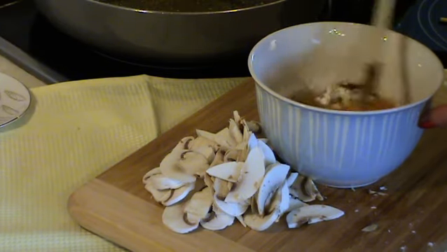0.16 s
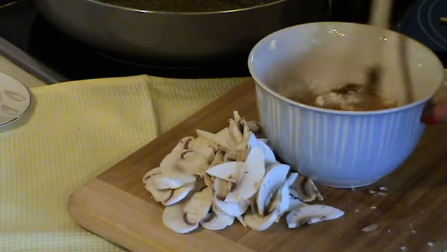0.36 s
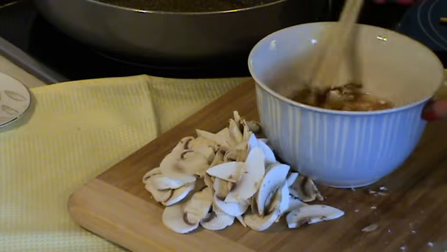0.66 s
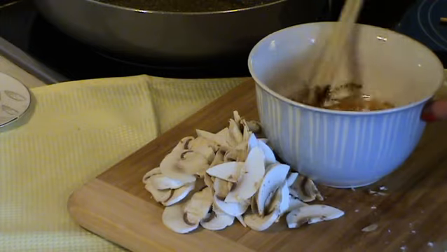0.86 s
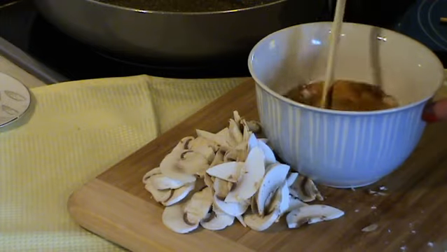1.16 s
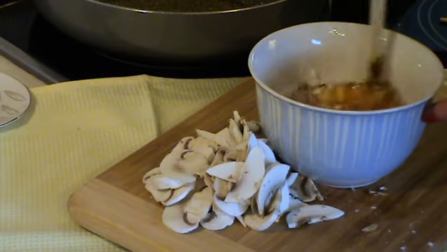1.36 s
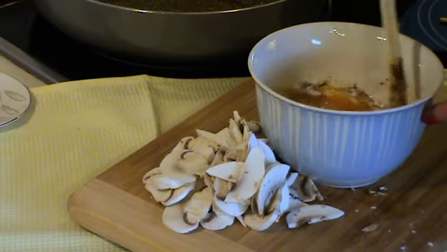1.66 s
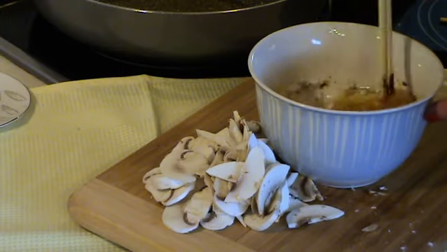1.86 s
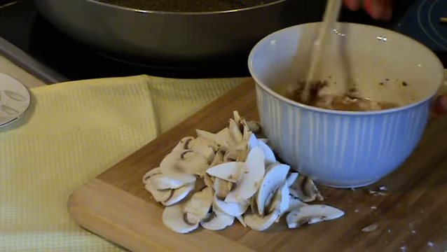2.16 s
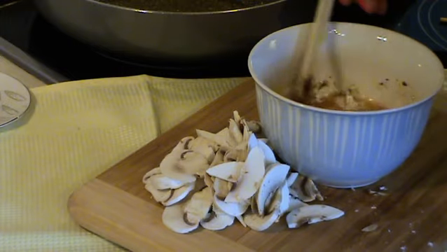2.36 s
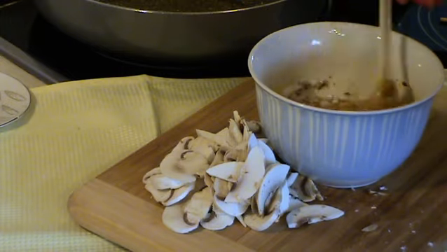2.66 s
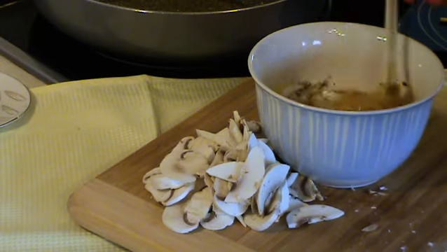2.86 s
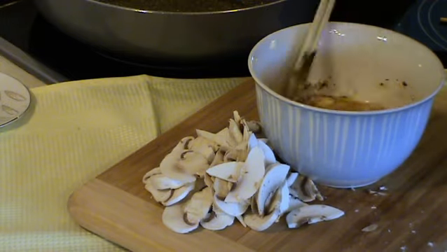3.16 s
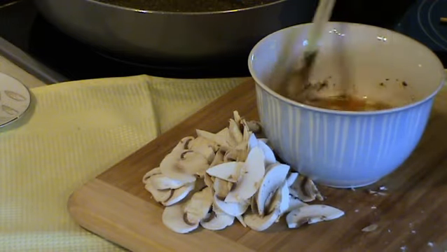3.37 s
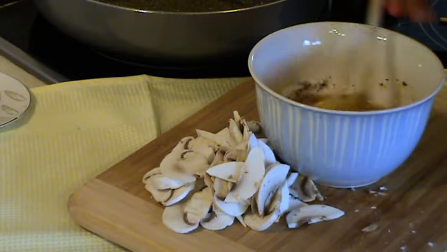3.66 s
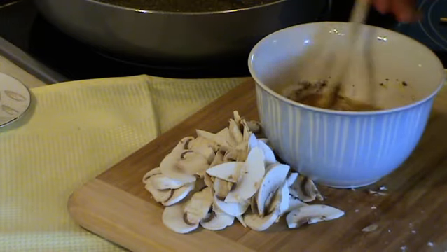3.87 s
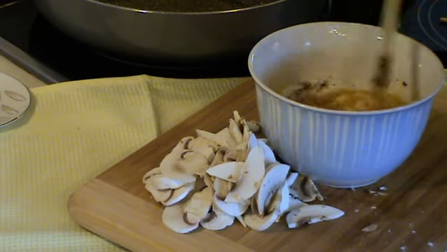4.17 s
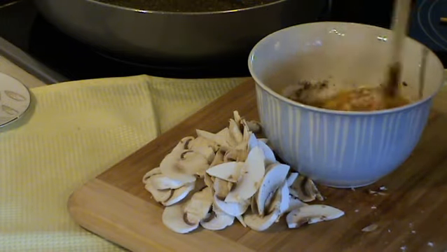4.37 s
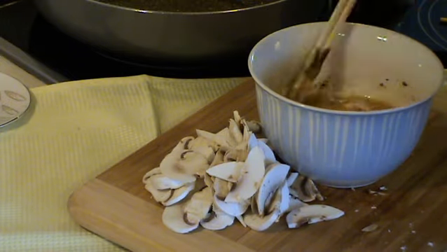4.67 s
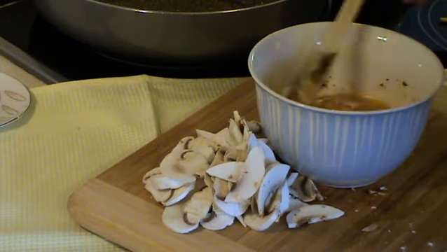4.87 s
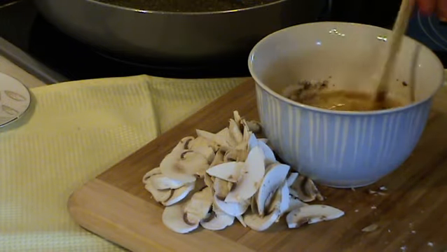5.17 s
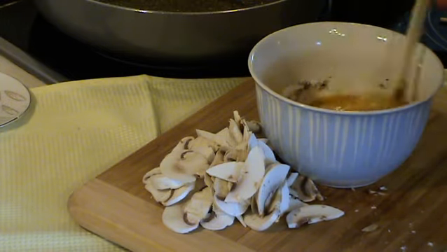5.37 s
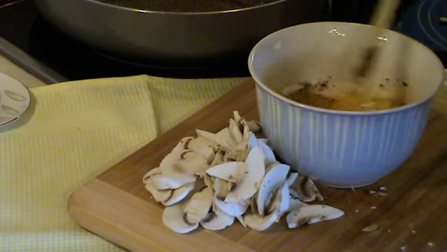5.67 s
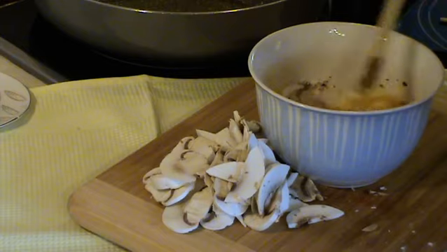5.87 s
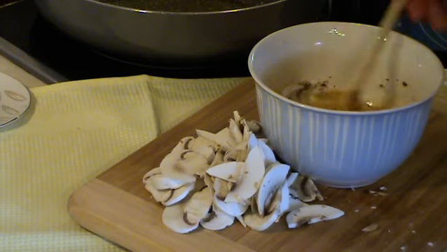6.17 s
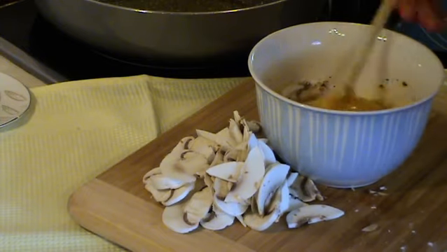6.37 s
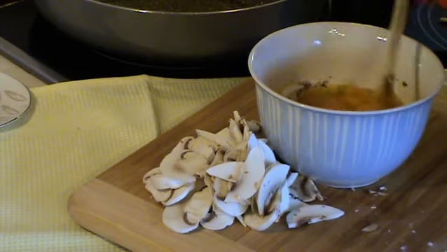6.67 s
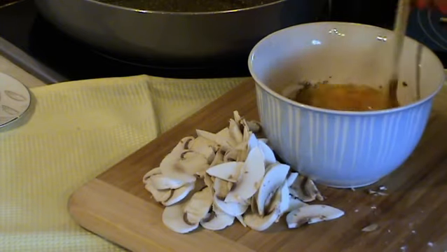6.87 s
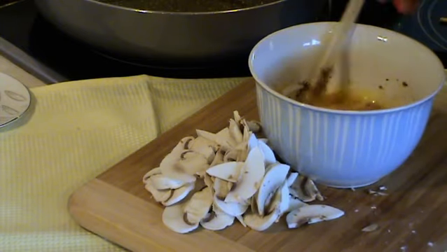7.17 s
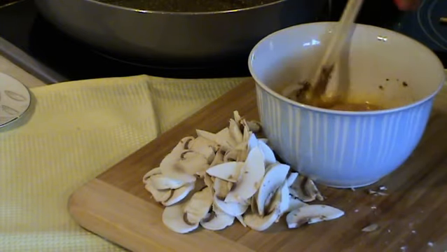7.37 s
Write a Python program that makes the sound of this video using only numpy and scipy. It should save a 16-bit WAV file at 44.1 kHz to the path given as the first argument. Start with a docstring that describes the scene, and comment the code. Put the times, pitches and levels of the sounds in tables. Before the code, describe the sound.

Close up in a small kitchen, wooden chopsticks beat eggs in a ceramic bowl at nearly five strokes a second. Dry clicks vary in strength; harder taps make the bowl ring briefly and brightly. Wet slops, small rising plops, grainy drags and tiny froth pops follow the strokes. The beating hesitates once early, then continues steadily to the end. Close stereo microphone, short room reflections, faint low hum and hiss.

```python
"""A small kitchen, close up: wooden chopsticks beat eggs in a ceramic bowl, nearly five strokes a second.
The sticks click in band-passed noise bursts; hard strokes reach the bare wall and ring its paired modes.
Short damped tones, mostly trapped air plopping, rise in pitch; the egg slops, drags and froths in noise
swells and tiny pops. A short noise-tail room surrounds the bowl, over a faint sine hum and coloured hiss."""
import sys
import numpy as np
from scipy import signal
from scipy.fft import rfft, irfft, next_fast_len
from scipy.io import wavfile

SR = 44100
rng = np.random.default_rng(int(sys.argv[2]) if len(sys.argv) > 2 else 0)


def int16_out(signal):
    """Quantize to a 16-bit WAV file."""
    q = np.round(np.clip(np.atleast_2d(signal).T, -1, 1) * 32767)
    wavfile.write(sys.argv[1], SR, q.astype(np.int16))


N = 331191

# Event levels come before the layer trims and the room.
# sticks clicking in the egg: (time [s], level [dB], brightness [dB per octave], t60 [s])
# a short t60 is a clean knock, a long one a skid
CLICKS = [(0.0997, -39, 0, 0.033), (0.3146, -40.5, 3.5, 0.01), (0.331, -43.5, -3, .014),
          (.706, -35.5, 18, 0.025), (0.7182, -43, -4, .03), (0.8106, -37.5, 6, 0.017),
          (0.9386, -43.5, -5, 0.093), (1.0099, -51, -1.5, .03), (1.1211, -54, 6, 0.0046),
          (1.3608, -55.5, -1, 0.021), (1.6048, -35.5, 0.5, 0.035), (1.69, -41.5, -1, 0.03),
          (1.712, -47.5, 6, 0.023), (1.7335, -39.5, -2.5, 0.029), (1.8146, -46, -5, 0.0088),
          (2.037, -34.5, -2.5, 0.016), (2.1515, -51.5, 16, 0.017), (2.242, -37, -2, 0.023),
          (2.3583, -35.5, 5, .012), (2.3598, -37, 2.5, 0.0043), (2.4411, -36.5, 0.5, 0.055),
          (2.449, -37.5, -18, 0.013), (2.579, -34, 0, 0.0044), (2.6619, -32.5, -12, 0.035),
          (2.6658, -32.5, 6.5, 0.025), (2.848, -44, -5, 0.0058), (2.9317, -44, -4.5, 0.0094),
          (3.001, -39.5, 2.5, 0.01), (3.2312, -49.5, 6, .022), (3.474, -38, 1.5, .03),
          (3.4853, -40.5, 0.5, 0.12), (3.689, -32, 0.5, 0.055), (3.699, -33, 3.5, .008),
          (3.813, -49, 7, 0.027), (3.9119, -32.5, 0, 0.011), (4.079, -43, -2.5, 0.03),
          (4.4075, -40.5, -2.5, 0.031), (4.5225, -47.5, 0.5, .014), (4.536, -43, -2, 0.015),
          (4.7463, -38.5, 0.5, 0.024), (4.9548, -32, 1.5, 0.024), (5.0064, -46, -5.5, 0.045),
          (5.1713, -37.5, -0.5, 0.019), (5.2149, -45, -6, 0.036), (5.229, -51, -9, .04),
          (5.3611, -42.5, -1.5, 0.056), (5.4785, -48.5, 6, 0.018), (5.5327, -48, -0.5, 0.0071),
          (5.654, -38.5, -3.5, 0.014), (5.7141, -38.5, -0.5, 0.02), (5.8896, -46.5, 11, .018),
          (5.9934, -33, 1, 0.0096), (6.1199, -44, 8, .018), (6.212, -35, -1.5, .02),
          (6.2507, -50, -3, .027), (6.3638, -41.5, -5.5, 0.0071), (6.4032, -39, -2.5, 0.018),
          (6.5457, -36.5, 2.5, 0.0047), (6.6114, -44, 2, .04), (6.6262, -38, 2, 0.0071),
          (6.747, -47.5, 11.5, 0.0099), (6.832, -36, -1.5, 0.037), (6.8366, -33.5, -9, 0.021),
          (6.9532, -49.5, -1, 0.011), (7.031, -36, 0, 0.027), (7.0438, -33.5, -1.5, 0.016),
          (7.1621, -36.5, -3, 0.013), (7.3822, -35.5, 5.5, 0.0064), (7.4554, -38, 17, 0.037)]
# taps on the bare wall:
# (time [s], click level [dB], brightness [dB per octave], ring level [dB], pitch the struck spot favours [Hz])
TAPS = [(0.5258, -35.5, -1, -42.5, 6500), (.5315, -38, -8.5, -39.5, 6040), (2.8665, -31, -0.5, -42.5, 7650),
        (3.0596, -29, 0.5, -30, 6000), (3.077, -29.5, 0, -31, 4500), (3.2676, -36.5, -2.5, -48.5, 5400),
        (4.1106, -34, -1, -41, 3500), (4.1256, -31.5, -2.5, -38.5, 6000), (4.3176, -25.5, 3, -32.5, 6400),
        (4.3385, -30, -3, -36, 4540), (5.3775, -32, 0, -29.5, 4580), (5.5767, -28, 2.5, -31, 8700),
        (5.794, -33.5, -3, -36, 7200), (7.2456, -28.5, 2.5, -32, 8900), (7.2652, -34, -5, -32, 4730),
        (7.4616, -26.5, -2, -27.5, 9500)]
# short damped tones: mostly air pockets, with a stopped bowl ring at 0.53 s and a faint squeak at 3.4 s:
# (time [s], pitch [Hz], level [dB], t60 [s])
DAMPED_TONES = [(0.3313, 3770, -42, 0.0068), (0.5286, 3230, -33, 0.02), (0.9386, 1300, -42, 0.029),
                (.969, 1320, -41, 0.0047), (.976, 1690, -50.5, .02), (1.0114, 1293, -41.5, 0.027),
                (1.12, 3840, -47.5, 0.0059), (1.6902, 3300, -34.5, 0.0017), (1.7361, 1530, -46.5, 0.014),
                (2.1527, 3540, -40, 0.011), (2.358, 3474, -30, 0.014), (2.4478, 1250, -34.5, 0.027),
                (2.4827, 1900, -43.5, 0.12), (2.577, 3470, -27.5, 0.012), (2.7955, 1125, -49, 0.02),
                (2.931, 1810, -36, 0.011), (3, 1050, -38.5, 0.0082), (3.405, 7400, -51.5, 0.004),
                (3.4775, 2060, -36, 0.006), (4.082, 1645, -41.5, 0.039), (4.1985, 1720, -45.5, 0.025),
                (4.838, 1250, -52.5, 0.037), (5.0069, 2520, -44, 0.0084), (5.04, 1190, -46, 0.0067),
                (5.229, 1390, -41.5, 0.031), (5.232, 2320, -49, .012), (6.5448, 1054, -26.5, 0.019),
                (6.8337, 813, -36.5, 0.025), (7.033, 5250, -35.5, 0.029)]
# egg thrown against the wall, with levels of its own: (time [s], deep level [dB], splash level [dB])
THROWS = [(0.529, -52, -50), (0.599, -57, -54), (.706, -55, -56), (1.52, -62, -85), (1.682, -58, -74),
          (2.033, -60, -59), (2.446, -58.5, -63), (3.067, -51.5, -43.5), (3.267, -52.5, -58.5),
          (4.116, -51.5, -48), (4.321, -52, -46.5), (5.579, -52, -45), (6.545, -61.5, -81),
          (7.249, -48.5, -39), (7.465, -51.5, -55.5)]
# scrapes along the glaze: (time [s], level [dB], half length [s])
SCRAPES = [(0.33, -65, 0.011), (1.389, -59, .022), (1.714, -55, 0.016), (1.843, -60.5, 0.057),
           (2.281, -53, .008), (2.672, -51, .013), (3.68, -50.5, 0.0065), (3.913, -42, 0.0083),
           (4.099, -47, 0.0041), (4.316, -46, .002), (6.388, -46, 0.0048), (6.452, -56.5, 0.015),
           (7.241, -48, .0024)]

# bending modes of the bowl: nominal pitch [Hz]
BOWL_HZ = [1314, 3315, 6012, 9232, 12800]
# decay of each mode and nominal distance to its twin: (t60 [s], split [Hz])
BOWL_MODES = [(0.23, 24.7), (0.26, 9), (0.27, 30), (0.088, 19), (0.035, 25)]
# click bands: (low edge [Hz], high edge [Hz])
CLICK_EDGES = [(780, 1390), (1500, 3350), (3000, 5900), (6000, 9570), (10000, 13300)]
# colour of a contact before the brightness tilt, one value per click band: (relative level [dB])
CLICK_COLOUR = [-7, 0.5, 1, -4.5, -17]
TAP_COLOUR = [-4.5, -1.5, 3.5, -2.5, -10]
# colour of the ring before tilt and struck spot, one value per middle bowl mode: (relative level [dB])
RING_COLOUR = [0, -12.5, -9.5]

# noise colours of the moving egg and the dragging sticks: (frequency [Hz], relative density [dB per Hz])
DEEP = [(45, -51), (82, -2.5), (108, -11), (160, 2), (205, -3.5), (260, -8.5), (420, -13.5), (900, -47.5)]
GULP = [(110, -15), (290, -2), (425, 3), (510, -9.5), (600, 0.5), (750, -25), (1500, -47)]
SPLASH = [(350, -33), (600, -12), (860, 6.5), (1050, 0), (1300, 8.5), (1600, -14), (4000, -48)]
DRAG = [(500, -9), (1100, 5), (2500, 7), (3800, 9.5), (7000, 6.5), (11000, -12), (16000, -21)]
# every stroke drags into the egg and out again:
# (time after the beat [s], level relative to stroke force [dB], half length [s])
DRAGS = [(-.002, -32.5, 0.013), (0.042, -27.5, 0.054)]

# decay of the room: (frequency [Hz], t60 [s])
KITCHEN = [(150, 0.48), (530, 0.38), (1400, 0.43), (3700, 0.3), (9700, 0.25), (16000, 0.18)]
# room air and microphone hiss, mid then side: (frequency [Hz], density [dB per Hz])
FLOOR_MID = [(20, -102), (60, -102), (110, -97), (165, -91), (250, -100), (650, -99), (1000, -102),
             (3000, -104), (5000, -106), (9000, -108.5), (9400, -103.5), (9800, -109), (16000, -109)]
FLOOR_SIDE = [(20, -115), (70, -109), (160, -100), (600, -96), (1700, -99.5), (3000, -104.5), (7500, -112),
              (11000, -116), (15000, -128)]
# phase lead of the left microphone port over the right: (frequency [Hz], phase [rad])
PORT_PHASE = [(100, 0), (400, 0.079), (1300, 0.36), (3000, 0.21), (9000, 0.33), (15000, 0)]
# the hand circles at a steady beat and hesitates once: (bout start [s], bout end [s])
BOUTS = [(0.1, 1.2), (1.61, 7.51)]

BEAT_S = 0.209
DEEP_DB, SPLASH_DB = -28.5, -27  # slop of any other stroke, relative to its force
SPOT_DB, SPOT_OCTAVES = 14, 0.49  # how much the struck spot lifts the modes near its pitch, and how near
DULL_ABOVE_HZ = 7500  # wood is too soft for the brightness tilt to rise beyond this
MAINS_HZ, TOP_HZ = 50, 16100


def amp(db):
    """Decibels to amplitude."""
    return 10 ** (np.asarray(db) / 20)


def unit(x):
    """Scales a sound to rms 1."""
    return x / np.sqrt(np.mean(x ** 2) + 1e-20)


def burst(x):
    """Gives a short sound the energy of a hundredth of a second at rms 1."""
    return x / np.sqrt(np.sum(x ** 2) / (SR / 100) + 1e-20)


def along(points, hz):
    """Reads (frequency [Hz], value) points on a log frequency axis."""
    f, v = np.transpose(points)
    return np.interp(np.log(hz + 1), np.log(f + 1), v)


def clock(seconds):
    """Sample times of a short sound."""
    return np.arange(int(seconds * SR)) / SR


def fade(t, t60):
    """Exponential decay by 60 dB in t60."""
    return np.exp(-np.log(1000) * t / t60)


def wander(t, depth_db, count):
    """A gain that drifts at random between evenly spaced knots."""
    knots = np.linspace(t[0], t[-1], num=count)
    return amp(depth_db * np.interp(t, knots, rng.standard_normal(count)))


def add(out, s, sound):
    """Mixes a sound into out at time s."""
    start = max(round(s * SR), 0)
    part = sound[..., :max(N - start, 0)]
    out[..., start:start + part.shape[-1]] += part


def filtered(x, response):
    """Filters x by a response given as a function of frequency."""
    m = next_fast_len(x.shape[-1] + 4096)
    spectrum = rfft(x, m) * response(np.fft.rfftfreq(m, 1 / SR))
    return irfft(spectrum, m)[..., :x.shape[-1]]


def coloured(points, size):
    """Noise with the given density in dB per Hz."""
    white = rng.standard_normal(size) * np.sqrt(SR / 2)
    return filtered(white, lambda hz: amp(along(points, hz)))


def kitchen(x, wet_db, width_db=-9.5, early=1.45, early_s=0.0049):
    """Puts a sound in the stereo room: strong early bounces off bowl and counter, then a short tail."""
    hz, t, z = signal.stft(rng.standard_normal((2, SR // 3)), SR, nperseg=256)
    decayed = z * fade(t, along(KITCHEN, hz)[:, None])
    tail = signal.istft(decayed, SR, nperseg=256)[1]
    t = np.arange(tail.shape[1]) / SR
    tail = tail * (1 + early * np.exp(-t / early_s)) * (1 - np.exp(-t / 0.00061))
    mid, side = amp(wet_db) * tail / np.linalg.norm(tail[0])
    mid[0] += 1  # the direct sound
    side = side * amp(width_db)
    return signal.fftconvolve(x[None], np.array([mid + side, mid - side]), axes=1)


def strokes():
    """(time [s], force [dB]) of every beat; force sums the contacts within a quarter beat either side."""
    s, db = np.transpose([row[:2] for row in CLICKS + TAPS])
    beats = np.concatenate([np.arange(start, end, BEAT_S) for start, end in BOUTS])
    forces = []
    for beat in beats:
        near_db = db[abs(s - beat) < BEAT_S / 4]
        forces.append((beat, 10 * np.log10(np.sum(amp(near_db) ** 2) + 1e-20)))
    return forces


def tilted(colour_db, hz, db, brightness):
    """Shares a level among bands or modes; a harder contact favours the high ones."""
    shape = np.add(colour_db, brightness * np.log2(hz))
    return db + shape - 10 * np.log10(np.sum(amp(shape) ** 2))


def contact(colour_db, db, brightness):
    """Level of each click band for one contact."""
    centres = np.sqrt(np.prod(CLICK_EDGES, axis=1))
    return tilted(colour_db, np.minimum(centres, DULL_ABOVE_HZ), db, brightness)


def click(bands_db, t60, snap=1.7, swish_db=-19, swish_s=0.0022, chatter_db=-24, chatter_s=0.032, grain_db=6):
    """A stick swishes through the egg, snaps on something hard and skids in tiny contacts; lands at 20 ms."""
    t = clock(.09) - .02
    grain = unit(wander(t, grain_db, 110))
    skid = amp(chatter_db) * grain * np.exp(-abs(t) / chatter_s)
    approach = amp(swish_db) * np.exp(-abs(t) / swish_s)
    shape = np.where(t < 0, approach, fade(abs(t), t60) + skid)
    out = np.zeros(len(t))
    for edges, db in zip(CLICK_EDGES, bands_db):
        force = shape * rng.standard_normal(len(t))
        force[np.argmax(t >= 0)] += snap
        band = signal.butter(2, edges, "bandpass", fs=SR, output="sos")
        out += amp(db) * burst(signal.sosfilt(band, force))
    return out


def sticks(level_db=-3.0, wet_db=-3):
    """Sticks click together and against the wetted bottom, damped by the egg."""
    out = np.zeros((2, N))
    for s, db, brightness, t60 in CLICKS:
        knock = click(contact(CLICK_COLOUR, db, brightness), t60)
        add(out, s - .02, kitchen(knock, wet_db))
    return amp(level_db) * out


def mode(t, hz, t60, split_hz, drift=0.0014):
    """A bowl is never quite round: each mode beats against an equal twin, and the moving egg detunes it."""
    hz = hz * (1 + drift * rng.standard_normal())
    twin_hz = hz + split_hz * rng.uniform(-0.74, 2.76)
    pair = np.sin(2 * np.pi * hz * t) + np.sin(2 * np.pi * twin_hz * t)
    return pair * fade(t, t60) * (1 - np.exp(-t / 0.0016))


def bowl(click_db=-4.5, click_t60=0.017, click_wet_db=-3, ring_wet_db=-10, ring_tilt=0.4, body_db=-15,
         rim_db=-12, flutter_db=1.5):
    """A tap on the bare wall cracks and rings the ceramic; egg washing over the wall makes the ring flutter."""
    out, t = np.zeros((2, N)), clock(.35)
    middle_hz = np.array(BOWL_HZ[1:-1])
    for s, tap_db, brightness, rung_db, spot_hz in TAPS:
        lift = SPOT_DB * np.exp(-(np.log2(middle_hz / spot_hz) / SPOT_OCTAVES) ** 2)
        middle_db = tilted(RING_COLOUR + lift, middle_hz, rung_db, ring_tilt * brightness)
        lowest_db = tap_db + body_db - brightness  # a dull, heavy blow rings the lowest mode best
        modes_db = [lowest_db, *middle_db, middle_db[-1] + rim_db]
        ring = np.zeros(len(t))
        for hz, (t60, split_hz), db in zip(BOWL_HZ, BOWL_MODES, modes_db):
            ring += amp(db) * wander(t, flutter_db, 60) * mode(t, hz, t60, split_hz)
        crack = amp(click_db) * click(contact(TAP_COLOUR, tap_db, brightness), click_t60)
        add(out, s - .02, kitchen(crack, click_wet_db))
        add(out, s, kitchen(ring, ring_wet_db))
    return out


def damped_tone(hz, t60, rise):
    """A brief sine gliding up as it dies, as an air pocket does when it nears the surface of thick egg."""
    t = clock(.06)
    pitch = hz * (1 + rise * (np.minimum(t / t60, 1) - .2))
    tone = np.sin(2 * np.pi * np.cumsum(pitch) / SR)
    return burst(tone * fade(t, t60) * (1 - np.exp(-t / 0.0025)))


def damped_tones(level_db=-2, wet_db=-5, rise=0.092, shed_db=-15, shed_s=0.008, shed_spread=0.12, count=3):
    """Mostly plopping air, plus a stopped bowl ring and a squeak; fainter, higher tones trail each one."""
    out = np.zeros((2, N))
    for s, hz, db, t60 in DAMPED_TONES:
        cluster = np.pad(damped_tone(hz, t60, rise), (0, SR // 10))
        for delay, raised in zip(rng.exponential(shed_s, count), rng.uniform(0.056, 2.3, count)):
            small = amp(shed_db) * damped_tone(hz * np.exp(shed_spread * raised), t60 / 2, rise)
            start = min(int(delay * SR), SR // 10)
            cluster[start:start + len(small)] += small
        add(out, s, kitchen(amp(db) * burst(cluster), wet_db))
    return amp(level_db) * out


def throws():
    """(time [s], deep [dB], splash [dB]) of egg per stroke: listed throws, then others that follow the force."""
    light = [(s, force + DEEP_DB, force + SPLASH_DB) for s, force in strokes()
             if all(abs(s - listed[0]) > BEAT_S / 4 for listed in THROWS)]
    return THROWS + light


def swell(t, peak_s, steep):
    """Envelope that rises to 1 at peak_s and dies away."""
    return (t / peak_s * np.exp(1 - t / peak_s)) ** steep


def slops(gulp_db=-1.5, splash_db=-2, deep_s=0.031, gulp_s=0.027, splash_s=0.023, lump_db=2.5, wet_db=-10,
          width_db=-8):
    """Egg falls back in lumps behind each stroke: the splash peaks first, then a gulp, the deep slop last."""
    out, t = np.zeros((2, N)), clock(.3)
    for s, deep, splash in throws():
        lumps = unit(wander(t, lump_db, 50))
        low = amp(deep) * swell(t, deep_s, steep=0.48) * unit(coloured(DEEP, len(t)))
        middle = amp(splash + gulp_db) * swell(t, gulp_s, steep=1.0) * unit(coloured(GULP, len(t)))
        high = amp(splash + splash_db) * swell(t, splash_s, steep=1.45) * unit(coloured(SPLASH, len(t)))
        slop = lumps * (low + middle + high) * (1 - t / t[-1]) ** 0.14
        add(out, s, kitchen(slop, wet_db, width_db))
    return out


def swishes(grain_db=4, wet_db=-3):
    """The sticks drag through the egg and along the glaze with a grainy hiss."""
    out, t = np.zeros((2, N)), clock(.16) - .08
    drags = [(s + lag_s, force + db, width) for s, force in strokes() for lag_s, db, width in DRAGS]
    for s, db, width in SCRAPES + drags:
        grain = unit(wander(t, grain_db, 160))
        drag = amp(db) * np.exp(-(t / width) ** 2) * grain * unit(coloured(DRAG, len(t)))
        add(out, s + t[0], kitchen(drag, wet_db))
    return out


def froth(level_db=-71, spread_db=4, lag_s=.06, centre_hz=2800, wet_db=-2, count=22):
    """Each stroke leaves tiny bubbles and sticky strands that burst soon after as damped sines."""
    out, t = np.zeros((2, N)), clock(.015)
    for s, _ in strokes():
        pops = np.zeros(SR // 3)
        delays = rng.gamma(2, lag_s / 2, count)
        pitches = centre_hz * np.exp(rng.uniform(-0.947, 1, count))
        levels_db = level_db + spread_db * rng.standard_normal(count)
        for delay, hz, db in zip(delays, pitches, levels_db):
            pop = np.sin(2 * np.pi * hz * t) * t * fade(t, 11 / hz)
            start = min(int(delay * SR), len(pops) - len(t))
            pops[start:start + len(t)] += amp(db) * burst(pop)
        add(out, s, kitchen(pops, wet_db))
    return out


def background(hum_db=-69):
    """Mains hum as one steady sine, with faint room air and microphone hiss as coloured noise."""
    mid, side = coloured(FLOOR_MID, N), coloured(FLOOR_SIDE, N)
    hum = np.sqrt(2) * np.sin(2 * np.pi * MAINS_HZ * np.arange(N) / SR)
    return np.array([mid + side, mid - side]) + amp(hum_db) * hum


def scene(pan_db=0.3):
    """The bowl stands slightly to the right, over the background."""
    beating = sticks() + bowl() + damped_tones() + slops() + swishes() + froth()
    return beating * amp([[-pan_db], [pan_db]]) + background()


def record(dry):
    """The left microphone port leads slightly in phase; nothing passes above the band limit."""
    ports = lambda hz: np.exp(.5j * along(PORT_PHASE, hz) * np.array([[1], [-1]]))
    return filtered(dry, lambda hz: ports(hz) * (hz < TOP_HZ))


dry = scene()
out = record(dry)
int16_out(out)
```